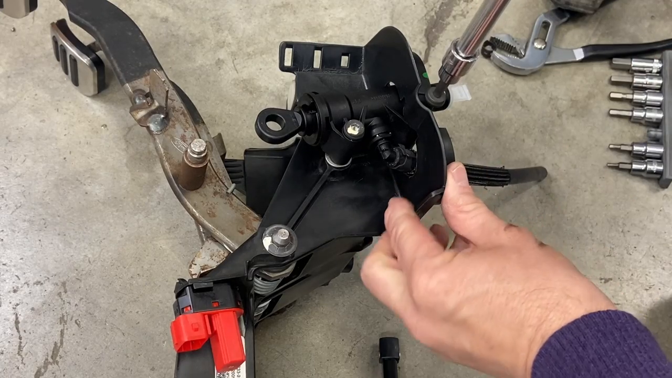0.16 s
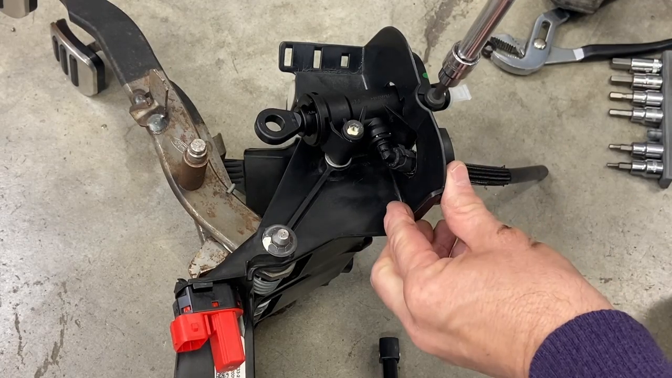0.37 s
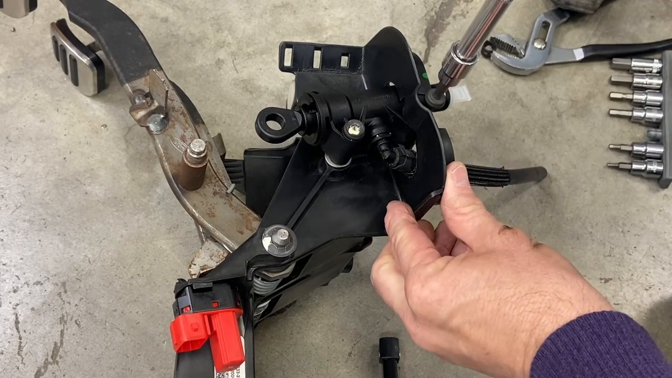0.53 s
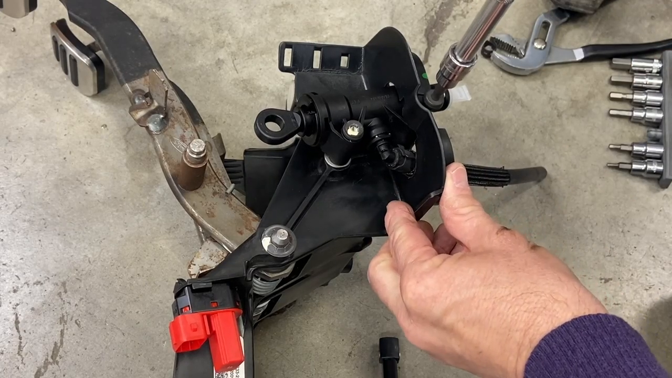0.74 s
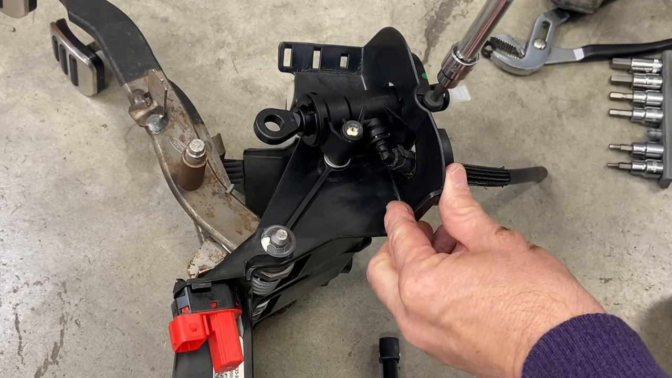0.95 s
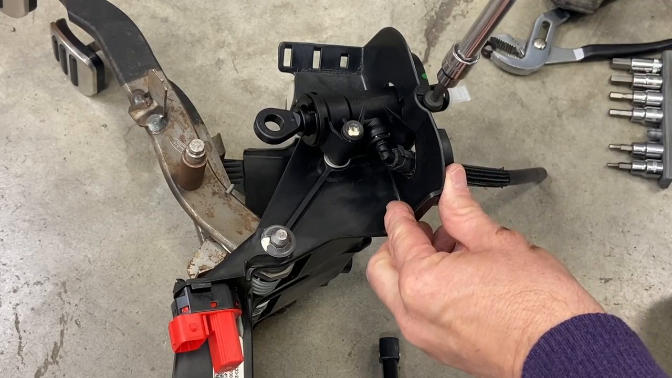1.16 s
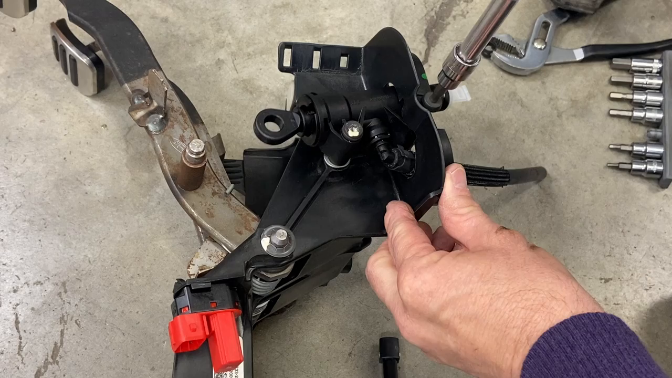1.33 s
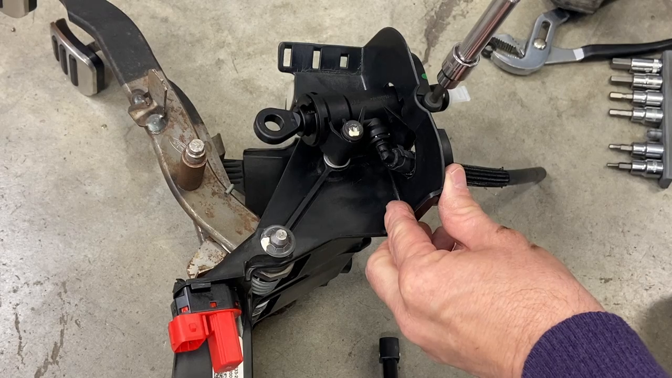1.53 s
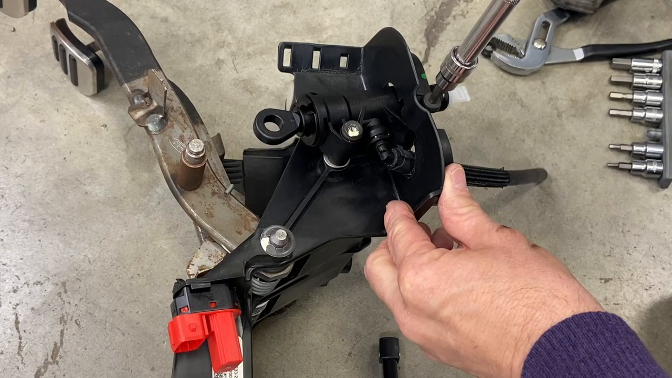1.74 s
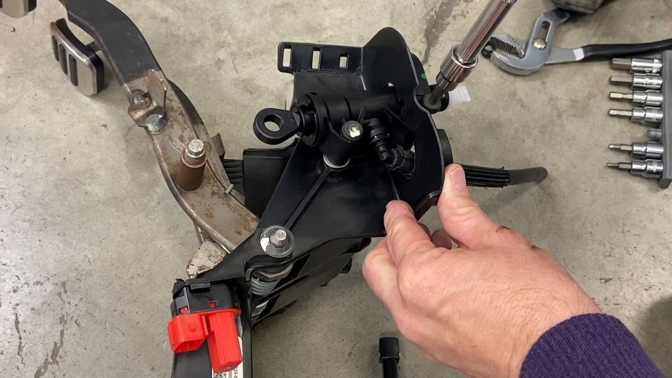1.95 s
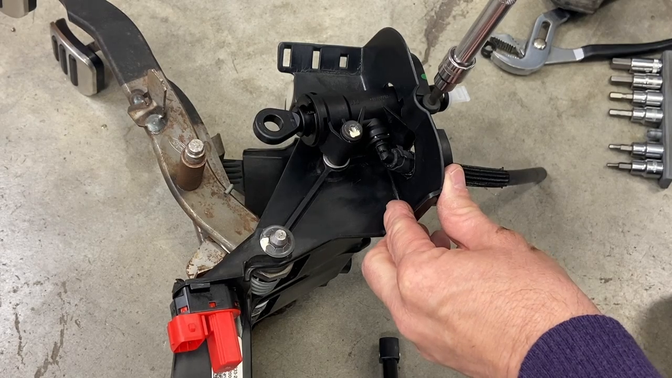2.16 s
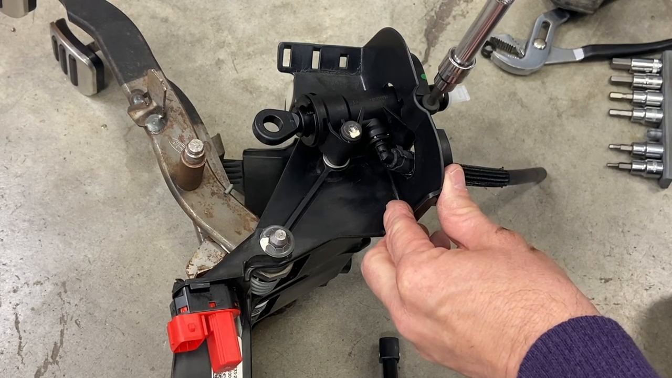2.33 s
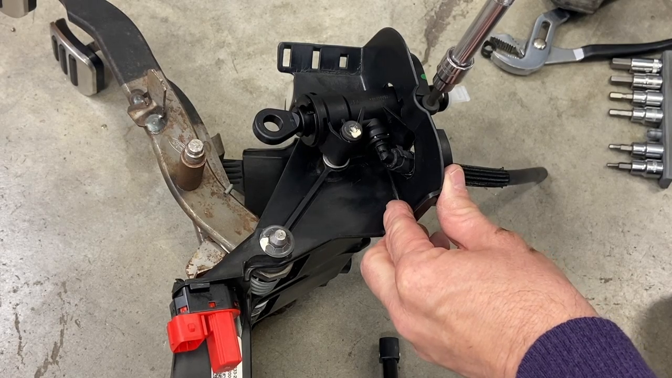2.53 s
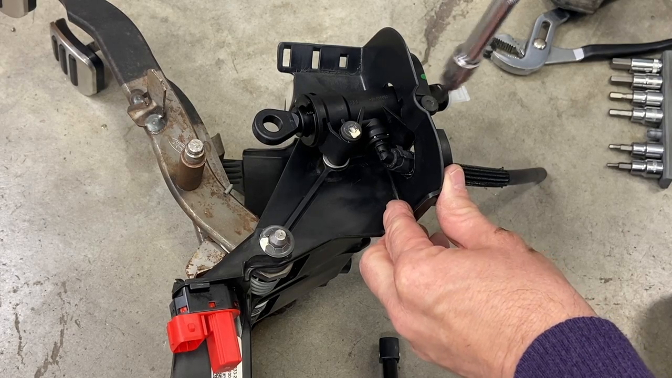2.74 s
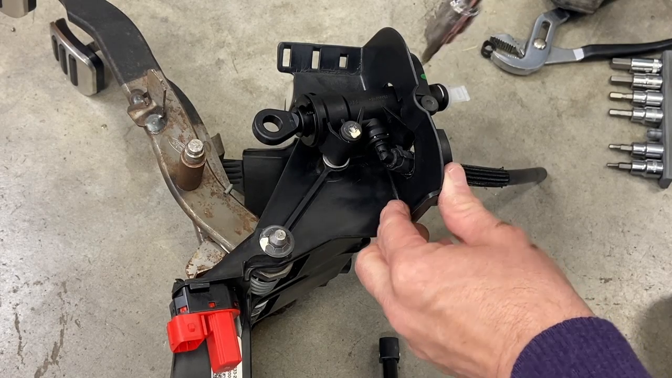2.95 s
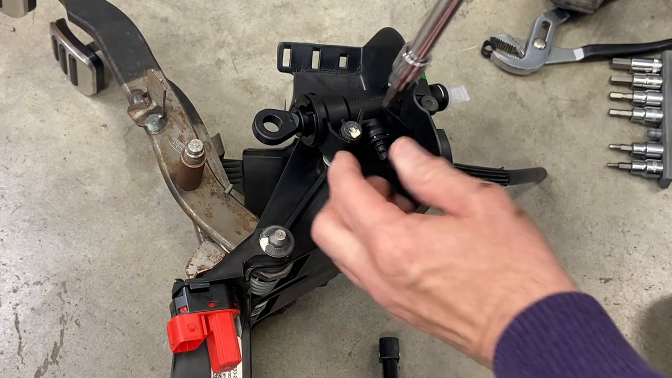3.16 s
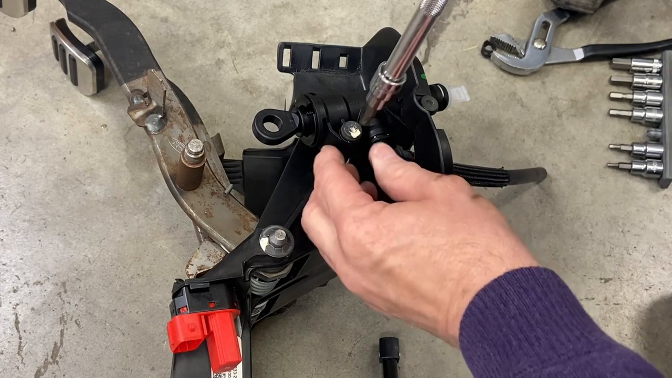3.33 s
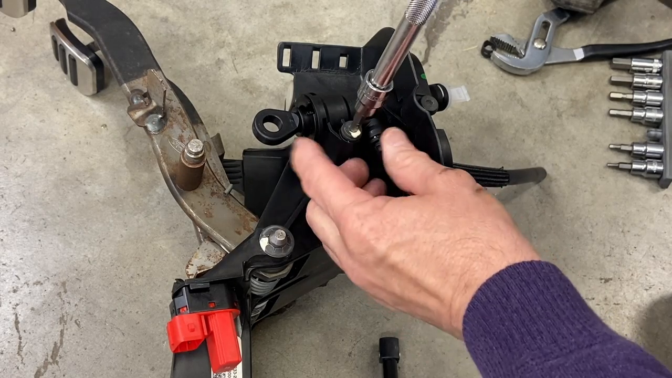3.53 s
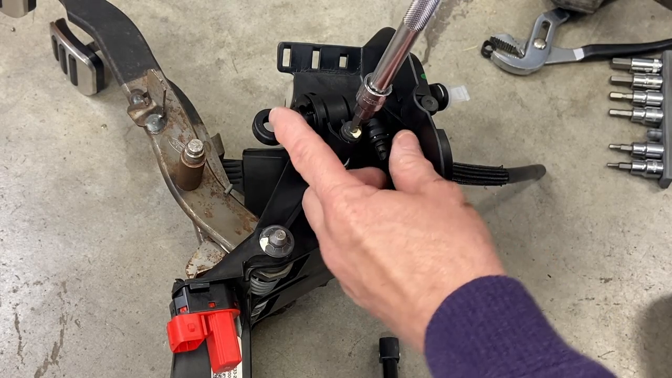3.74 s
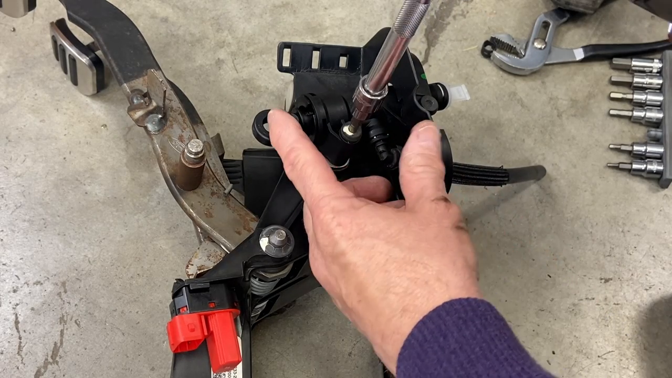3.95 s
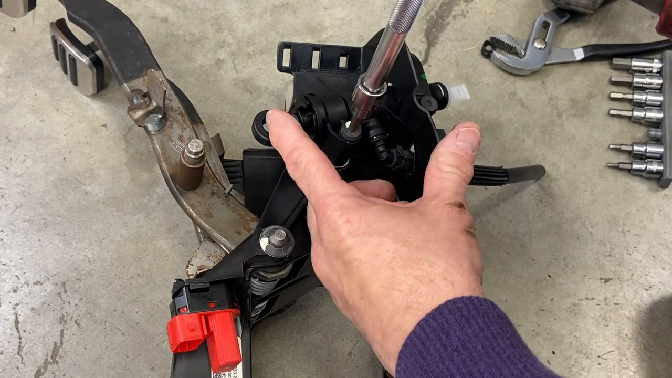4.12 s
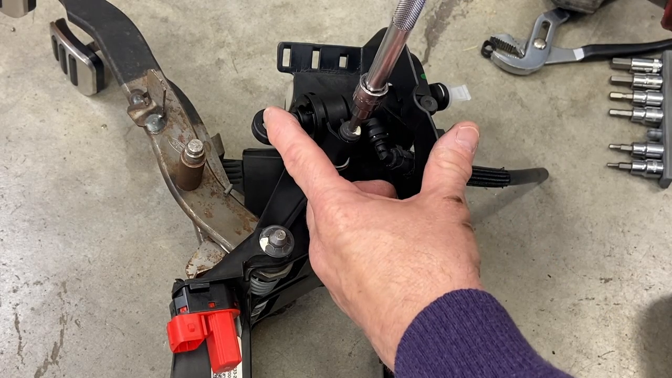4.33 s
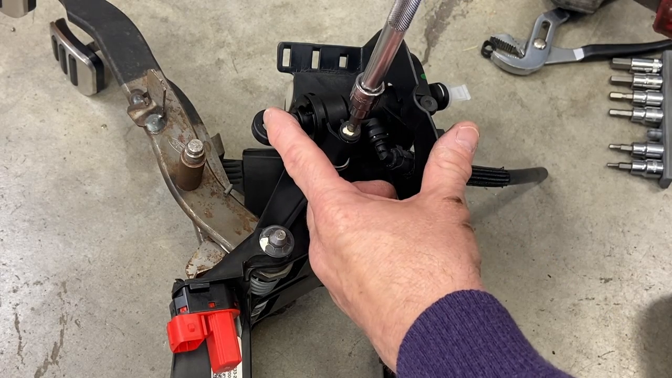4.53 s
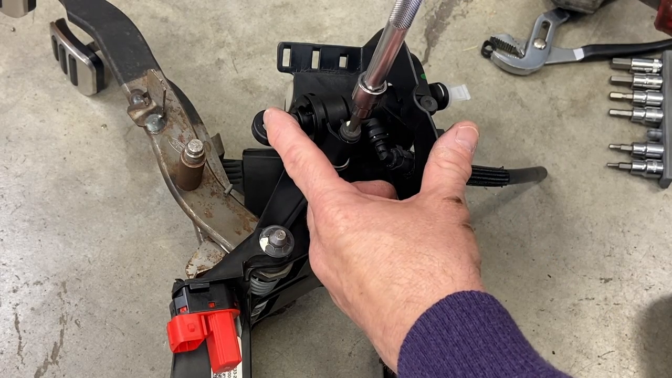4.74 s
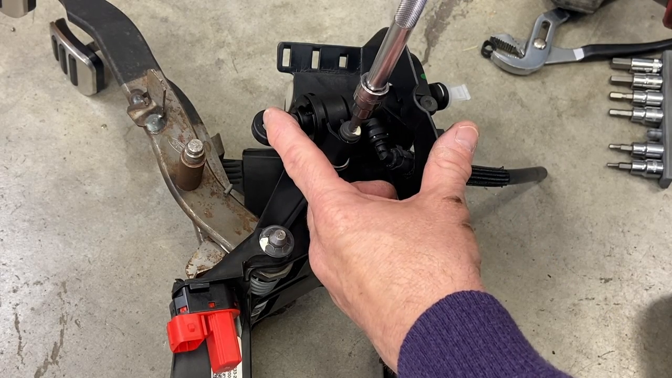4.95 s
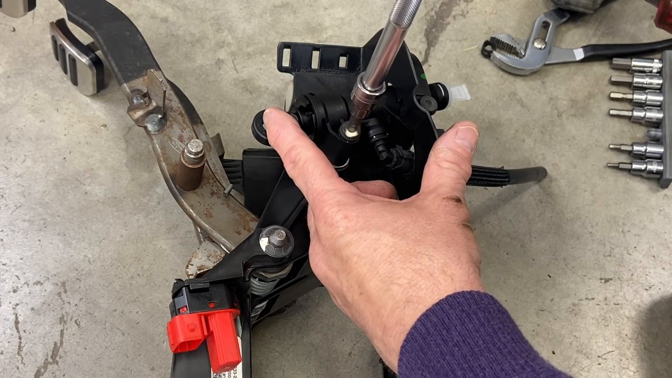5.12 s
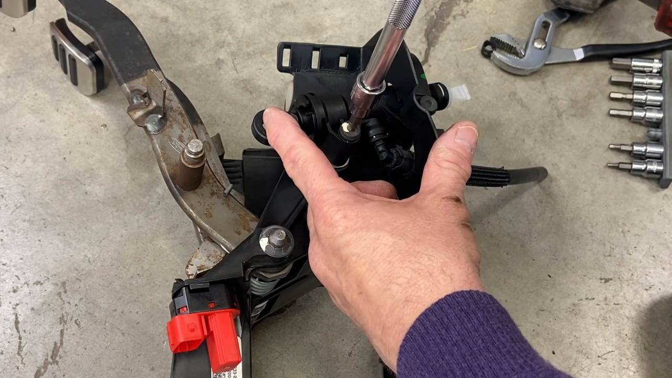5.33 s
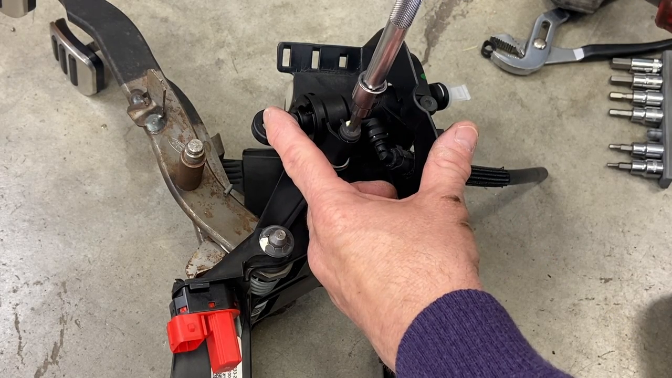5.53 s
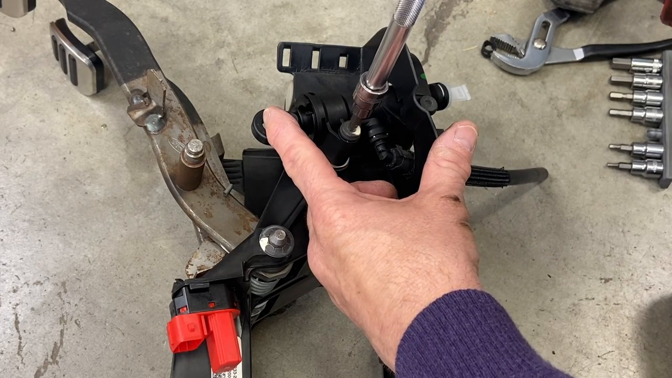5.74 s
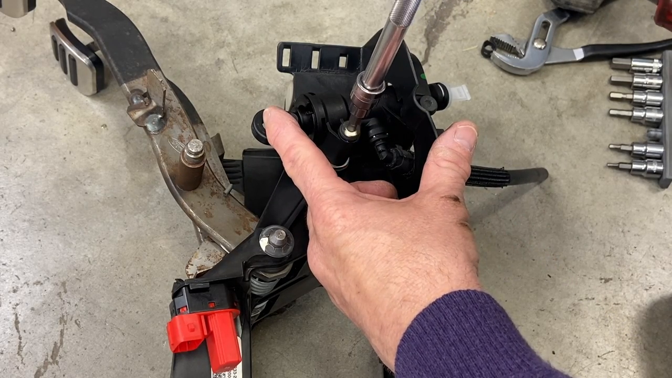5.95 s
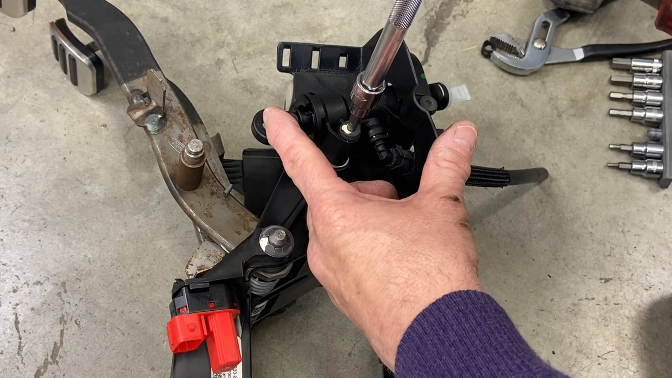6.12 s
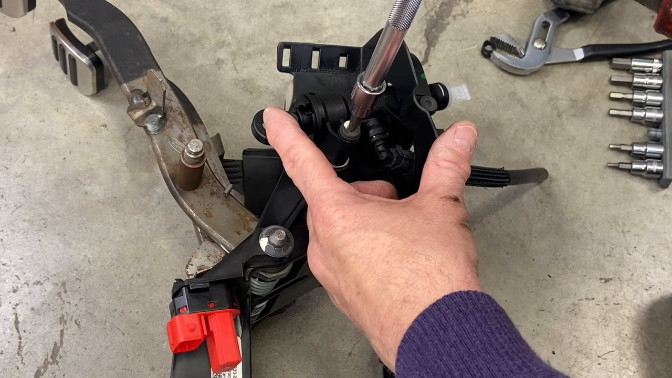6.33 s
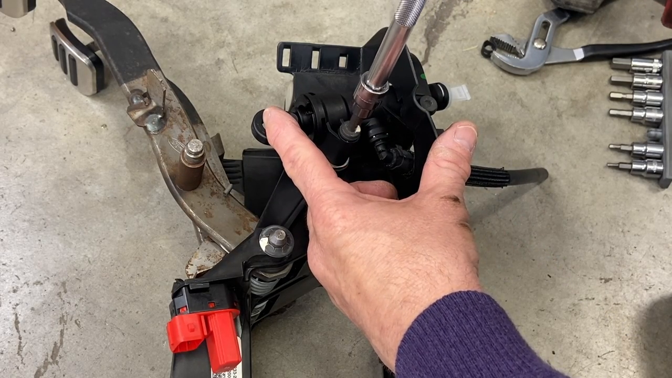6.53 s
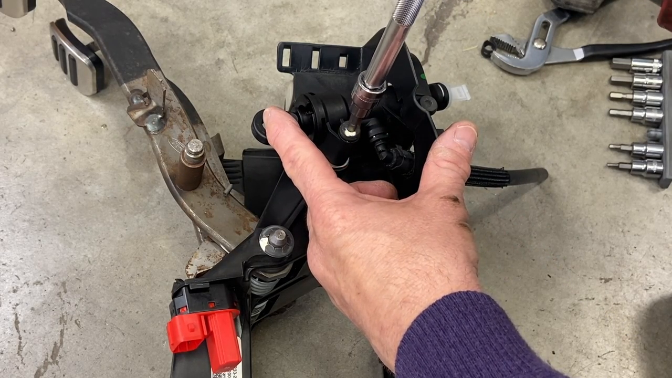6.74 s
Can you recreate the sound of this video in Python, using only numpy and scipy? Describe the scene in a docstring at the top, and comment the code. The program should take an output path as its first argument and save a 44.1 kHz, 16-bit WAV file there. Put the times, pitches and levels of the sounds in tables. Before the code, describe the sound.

Close power ratchet buzzing hard, a brief pause with steel socket knocks and scuffs, then a slower, lower, wavering ratcheting run in a garage.

```python
"""Cordless ratchet on two bolts

A cordless ratchet in a garage runs down one bolt at full trigger, then another feathered and slower.
A motor drives a crank through gears; each crank turn rocks a pawl that clacks over a few teeth.
Between the bolts the socket knocks and scuffs against the next head: noise cracks and ringing steel.
A phone with two ports listens close by, over a sparse-tap garage tail and a low hush."""
import sys
import numpy as np
from scipy import signal
from scipy.fft import rfft, irfft
from scipy.io import wavfile
from scipy.ndimage import uniform_filter1d

SR = 44100
rng = np.random.default_rng(int(sys.argv[2]) if len(sys.argv) > 2 else 0)


def boost(x):
    """Linear amplitude factor 10**(x/20) for a level x in decibels (scalar or array-like)."""
    u = np.asarray(x, float) / 20
    return 10 ** u


def materialize(psi):
    """Save the field psi as 16-bit PCM at rate SR to the path in sys.argv[1].

    A 1-D psi becomes a single channel; in a 2-D psi each row is a channel.
    """
    bounded = np.clip(np.atleast_2d(psi).T, -1, 1)
    quanta = np.round(bounded * 32767).astype(np.int16)
    wavfile.write(sys.argv[1], SR, quanta)


N = 298998

# hardest clacks: start_s, level_db
HARD_CLACKS = [(0.3072, -13.5), (0.4339, -8), (0.6619, -18), (0.7098, -22.5), (0.825, -7.5), (1.4137, -21),
               (1.8068, -11.5), (2.1026, -17.5), (2.135, -13.5), (2.4628, -13.5), (3.899, -14),
               (3.929, -16), (3.9609, -20.5), (4.1754, -20), (4.341, -17), (4.5406, -14.5), (4.7526, -18),
               (4.9851, -16), (5.0195, -13.5), (5.23, -18.5), (5.2699, -16), (5.4944, -18), (5.683, -21.5),
               (5.7214, -16), (5.7588, -30), (5.7967, -19), (6.0432, -14.5), (6.0886, -16.5),
               (6.1355, -16.5), (6.1818, -15), (6.3106, -17.5), (6.3495, -20.5), (6.4567, -16.5)]
FULL_SPEED_TURNS_PER_S = 61


def evened(x):
    """Scales to rms 1."""
    return x / np.sqrt(np.mean(x ** 2) + 1e-20)


def drifting(count, size):
    """Slow random drift of rms 1: noise averaged over size samples."""
    return evened(uniform_filter1d(rng.standard_normal(count), size=size))


def read(points, hz):
    """Reads a table on a log-frequency axis."""
    f, value = np.transpose(points)
    return np.interp(np.log(hz + 1), np.log(f + 1), value)


def colour(x, gain):
    """Filters by a gain given as a function of frequency."""
    spectrum = rfft(x) * gain(np.fft.rfftfreq(x.shape[-1], 1 / SR))
    return irfft(spectrum, x.shape[-1])


def add(mix, s, sound):
    """Mixes a sound in at time s."""
    part = mix[round(s * SR):][:len(sound)]
    part += sound[:len(part)]


def rings(modes, size):
    """One dying sine a mode."""
    t = np.arange(size) / SR
    return np.array([boost(db - 60 * t / t60) * np.sin(2 * np.pi * hz * t) for hz, db, t60 in modes])


def patchy(x, depth_db):
    """Bands a few hundred Hz wide swell and sink by chance over tens of milliseconds."""
    z = signal.stft(x, nperseg=512)[2]
    field = rng.standard_normal(z.T.shape)
    field = uniform_filter1d(field, size=5, axis=0)  # over time
    field = uniform_filter1d(field, size=7, axis=1).T  # over frequency
    return signal.istft(z * boost(depth_db * evened(field)), nperseg=512)[1][:len(x)]


def hush():
    """Steady low background: coloured noise."""
    # background spectrum: freq_hz, gain_db
    hush_curve = [(18, -41.5), (30, -22.5), (76, -5), (189, -20.5), (290, -16.5), (600, -30.5), (1000, -32),
                  (2000, -37), (4000, -59.5)]
    level_db = -82.5
    return boost(level_db) * evened(colour(rng.standard_normal(N), lambda hz: boost(read(hush_curve, hz))))


def garage(x):
    """Room tail: sparse taps of random sign, each band dying at its own speed."""
    # decay of the room: freq_hz, t60_s
    decay = [(200, .3), (1000, 0.44), (4000, 0.6), (9000, 0.37), (12000, 0.26), (15000, .2)]
    level_db = -14
    taps = np.zeros(SR)
    at = np.arange(300, SR - 20, 20)
    taps[at + rng.integers(0, 20, len(at))] = rng.choice([-1., 1.], len(at))
    hz, t, z = signal.stft(taps, SR, nperseg=256)
    tail = signal.istft(z * boost(-60 * t / read(decay, hz)[:, None]), SR, nperseg=256)[1]
    return boost(level_db) * signal.fftconvolve(x, tail / np.linalg.norm(tail))[:N]


def scattered(heard):
    """Nearby surfaces scatter a smeared copy: noise dying at one speed, coloured."""
    # part of opposite sign at the two ports: freq_hz, gain_db
    unlike_curve = [(40, -4), (150, -3), (300, -7), (800, -8), (1400, -3), (1900, -7), (2400, -21),
                    (3500, -27), (7000, -28), (8000, -22), (15000, -21)]
    size, t60_s = SR // 2, .5
    smear = rng.standard_normal(size) * boost(-60 * np.arange(size) / SR / t60_s)
    copy = signal.oaconvolve(heard, smear / np.linalg.norm(smear))[:N]
    return colour(copy, lambda hz: boost(read(unlike_curve, hz)))


def stop_thud(out):
    """Thud as the motor brakes after the first bolt: one low mode."""
    start_s, pitch_hz, level_db, t60_s = 2.79, 62, -47, .1
    add(out, start_s, rings([(pitch_hz, level_db, t60_s)], size=6000)[0])


def scuff():
    """Socket sliding onto the head: band-limited noise that rises fast and fades."""
    # slides: start_s, level_db, fade_db_per_s
    slides = [(3.479, -51.5, 170), (3.687, -46.5, 240)]
    rise_s = 0.0099
    noise = evened(colour(rng.standard_normal(N), lambda hz:
                          hz / 250 / (1 + (hz / 250) ** 2) / (1 + (hz / 6000) ** 2)))
    envelope = np.zeros(N)
    for start_s, level_db, fade_db_per_s in slides:
        since_s = np.maximum(np.arange(N) / SR - start_s, 0)
        envelope += np.minimum(since_s / rise_s, 1) * boost(level_db - fade_db_per_s * since_s)
    return noise * envelope


def knocks():
    """Socket on bolt head: each knock is a dull noise crack, ringing steel and a low frame ring."""
    # knocks: start_s, level_db, low_ring_db, steel_ring_db
    hits = [(3.1184, -58, -21, -20), (3.1354, -57, -19, -21), (3.1633, -46, -27, -32),
            (3.1794, -61, -22, -20), (3.482, -42.5, -10, -8.5), (3.491, -43, -3, -17),
            (3.5305, -40, -13, -25), (3.5384, -44, -9, -18), (3.548, -33, -18, -25),
            (3.5585, -25, -27, -18.5), (3.6897, -39, -24, -22), (3.7032, -25.5, -10.5, -21)]
    # ring modes, the frame first, then the steel: pitch_hz, level_db, t60_s
    socket_modes = [(548, -2, 0.057), (1050, -19, .02), (1445, 1, 0.03), (1960, -17, 0.018),
                    (2270, 7, 0.032), (2700, 6, 0.019), (3030, 5.5, .025), (3450, 6, 0.023),
                    (4070, -1, .02)]
    out, t, modes = np.zeros(N), np.arange(6000) / SR, rings(socket_modes, size=6000)
    for start_s, level_db, low_db, ring_db in hits:
        crack = signal.lfilter([.5, -.5], [1, -1.5, .56], rng.standard_normal(len(t)))
        crack *= boost(-60 * t / 0.033) + boost(-10 - 60 * t / 0.086)
        crack = signal.lfilter([.5, .5], [1], crack)  # dulls the very top
        steel = rng.uniform(0.9, 1, len(socket_modes) - 1) @ modes[1:]
        add(out, start_s, boost(level_db) * (0.3 * crack + boost(ring_db) * steel + boost(low_db) * modes[0]))
    return out


def switching(t, shaft):
    """Drive switching tone, pushed up by the fourth motor order."""
    tone_hz = 9800
    return np.sin(2 * np.pi * tone_hz * t + 4 * shaft)


def whistle(t, shaft):
    """Gear mesh whistles for a while, each on one motor order, fading quickly in and out."""
    # whistles, mostly where an order passes 4 kHz: start_s, end_s, motor_order, rms_db
    whistles = [(0, .85, 8, -44), (.87, 1.65, 8, -49), (3.76, 4.06, 18, -50), (4.12, 4.43, 16, -50),
                (4.87, 5.05, 20, -46), (5.07, 5.27, 20, -43), (6.4, 6.455, 20, -42)]
    edge_db_per_s = 400
    out = np.zeros(len(t))
    for start_s, end_s, order, rms_db in whistles:
        outside_s = np.maximum(np.maximum(start_s - t, t - end_s), 0)
        out += boost(rms_db - edge_db_per_s * outside_s) * np.sqrt(2) * np.sin(order * shaft)
    return out


def whine(shaft, rate, level_db):
    """Motor orders that come and go, sinking into the rattle at low speed."""
    # harmonics of the motor: motor_order, level_db
    orders = [(1, -6), (3, -7.5), (4, 2), (8, 0.5)]
    slow_db_per_octave = 4
    patches_db = np.minimum(7 * drifting(len(shaft), 1800), 4)
    slow_db = slow_db_per_octave * np.log2(rate / FULL_SPEED_TURNS_PER_S)
    tone = sum(boost(db) * np.sin(k * shaft) for k, db in orders)
    return boost(level_db + patches_db + slow_db) * tone


def thump(turns):
    """Yoke reversal: crank harmonics, with the crank place wobbling slightly."""
    # harmonics of the crank: crank_order, level_db
    orders = [(1, -14), (2, -11.5), (3, -13.5), (4, -14), (5, -11.5), (6, -9.5), (7, -21), (8, -4.5),
              (9, -4), (10, -13), (11, -3.5), (12, -4), (13, -2), (14, -0.5), (15, -2), (16, -18.5),
              (17, 1.5), (18, -0.5)]
    wobble_turns = .018 * drifting(len(turns), 1500)
    return sum(boost(db) * np.cos(2 * np.pi * k * (turns + wobble_turns) + k * k) for k, db in orders)


def whirr(turns, swell_db, place_turns, head_db, boom_db, tilt_db_per_octave):
    """Loose gear teeth rattle densely, more on the loaded stroke; the head and the part on the floor resonate."""
    # rattle spectrum: freq_hz, gain_db
    whirr_curve = [(30, -36), (65, -4.5), (150, -18.5), (400, -3), (1000, -1.5), (2400, 5), (5200, 6.5),
                   (7500, 7), (11000, 4.5), (15600, -3), (16200, -40.5)]
    head_hz, head_width_hz, boom_hz, boom_width_hz = 4150, 170, 135, 70
    ticks_per_s = 2500
    ticks = boost(4 * np.minimum(rng.exponential(1, len(turns)), 5))
    ticks *= rng.random(len(turns)) < ticks_per_s / SR
    ticks *= rng.choice([-1, 1], len(turns))
    rattle = 0.64 * evened(ticks) + rng.standard_normal(len(turns))
    rattle *= boost(swell_db * np.cos(2 * np.pi * (turns - place_turns)))

    def gain(hz):
        gain_db = read(whirr_curve, hz) + tilt_db_per_octave * np.log2(np.maximum(hz / 4500, 1))
        gain_db += head_db / (1 + (2 * (hz - head_hz) / head_width_hz) ** 2)
        gain_db += boom_db / (1 + (2 * (hz - boom_hz) / boom_width_hz) ** 2)
        return boost(gain_db)

    sound = colour(patchy(rattle, depth_db=1.5), gain)
    band = colour(sound, lambda hz: (hz > 1500) * (hz < 4500))
    return sound / np.std(band)  # rms 1 in that band


def clacks(length, at, size_db):
    """Each clack and its two quick bounces ring the pawl modes in their own mix and a little off pitch."""
    # pawl modes: pitch_hz, level_db, t60_s
    pawl_modes = [(2320, -25.5, 0.016), (3070, -13.5, 0.0084), (5170, -9, 0.016), (5510, -21, 0.0083),
                  (6470, -6.5, 0.0085), (6996, -0.5, 0.007), (8240, -5, 0.014), (9253, 9, 0.0077),
                  (10090, -1.5, 0.016), (10800, -3, 0.0091), (12060, 0, .005), (13810, -1.5, 0.0039),
                  (15050, -8.5, 0.01)]
    hz, db, t60 = np.transpose(pawl_modes)[:, :, None]
    t, out = np.arange(500) / SR, np.zeros(length + SR)
    chance = rng.standard_normal((len(at), 3, len(pawl_modes), 1))
    for start, level_db, (detune, mix, late) in zip(at.astype(int), size_db, chance):
        sines = np.sin(2 * np.pi * hz * (1 + .022 * detune) * t)
        ring = (boost(db + 3 * mix - 60 * t / t60) * sines).sum(0)
        ring *= np.minimum(t / .0003, 1)  # soft first touch
        ring *= 2 * boost(level_db) / abs(ring).max()
        bounce = start + int(SR * .0012 * (.5 + abs(late[0, 0])))
        again = bounce + int(SR * .0016 * (.5 + abs(late[1, 0])))
        for place, gain in [(start, 1), (bounce, 0.28), (again, 0.55)]:
            out[place:place + len(t)] += gain * ring
    return out[:length]


def pawl(t, turns, teeth):
    """The pawl drops over the same few teeth every turn, a little early or late."""
    spread_db = 2.6  # clack to clack
    place, db, scatter = np.transpose(teeth)
    whole = np.arange(np.ceil(turns[-1]) + 1)[:, None]
    drift = rng.standard_normal((len(whole), len(teeth)))
    drift = evened(uniform_filter1d(drift, size=4, axis=0))
    at = np.interp(whole + place + scatter * drift, turns, np.arange(len(t)), -1, -1).ravel()
    size_db = (db + spread_db * rng.standard_normal(drift.shape)).ravel()
    # a hard clack takes the tooth's place
    gap_s = abs(t[0] + at[:, None] / SR - np.transpose(HARD_CLACKS)[0]).min(1)
    used = (gap_s > .003) & (at > 0)
    return evened(clacks(len(t), at[used], size_db[used]))


def ratchet(speed, first_turn, load, clack_db, teeth, bolt):
    """One bolt run down: whirr, whine, thump and clacks on one crank."""
    whirr_db, whirr_db_per_octave = -32.5, 7.5  # at full speed; rise with speed
    clack_db_per_load_db, motor_turns_per_crank_turn = 1.5, 7.135
    start_s, brake_s, silent_db = 0.021, .018, -18  # trigger pulled, released
    swell_db, place_turns, thump_db, whine_db, head_db, boom_db, switch_db, tilt_db_per_octave = bolt

    t = np.arange(speed[0][0], speed[-1][0], 1 / SR)
    rate = uniform_filter1d(np.interp(t, *np.transpose(speed)), size=6000, mode="nearest")
    turns = first_turn + np.cumsum(rate) / SR
    waver = 1 + .002 * drifting(len(t), 900)
    shaft = 2 * np.pi * np.cumsum(motor_turns_per_crank_turn * rate * waver) / SR
    load_db = np.interp(t, *np.transpose(load))

    # no ramp where the tool already runs at 0 s or still runs at the end
    off = np.clip(1 - (t - t[0]) / start_s, 0, 1) * (t[0] > 0)
    off += np.clip(1 - (t[-1] - t) / brake_s, 0, 1) * (t[-1] < N / SR - .1)
    ramp_db = silent_db * off
    level_db = whirr_db + whirr_db_per_octave * np.log2(rate / FULL_SPEED_TURNS_PER_S) + ramp_db

    body = whirr(turns, swell_db, place_turns, head_db, boom_db, tilt_db_per_octave)
    body += boost(thump_db) * thump(turns)
    body += whine(shaft, rate, whine_db)
    body += boost(switch_db) * switching(t, shaft)
    # clacks feel load more and take the ramp twice
    clatter = boost(clack_db + clack_db_per_load_db * load_db + ramp_db) * pawl(t, turns, teeth)
    tool = boost(level_db) * (boost(load_db) * body + clatter)
    return t[0], tool + boost(ramp_db) * whistle(t, shaft)


def scene():
    """The tool and the socket close by, the garage tail, a low hush."""
    # crank speed under the trigger finger, one table a bolt: time_s, speed_turns_per_s
    speeds = [
        [(0, 60.5), (.12, 61.1), (.6, 61.3), (2.8, 60.8)],
        [(3.75, 31.48), (4.07, 31.87), (4.24, 37.58), (4.88, 29.94), (4.96, 29.89), (5.43, 25.77),
         (5.77, 26.94), (6.15, 20.63), (6.61, 33.69), (6.78, 31.37)],
    ]
    # work on the thread, one table a bolt: time_s, load_db
    loads = [
        [(0, 6), (.1, 4.5), (.3, 0.5), (.5, 2.5), (.76, 1), (1, 0.5), (1.3, 0.3), (1.55, 0.4), (2.05, 0.5),
         (2.45, 0.7), (2.55, 2.7), (2.8, -2.5)],
        [(3.75, 0.5), (3.9, -0.4), (4.04, -1), (4.18, 0.3), (4.6, -0.44), (5.2, 0.7), (5.5, 0.8), (6.06, 2),
         (6.36, 1.74), (6.78, 1.5)],
    ]
    # teeth passed in one crank turn, one table a bolt: place_turns, level_db, scatter_turns
    teeth_sets = [
        [(-.16, -6, .025), (-.04, 0, .025), (.1, -12, .04), (.22, -5, .025), (.5, -10, .04), (.68, -13, .04)],
        [(-.36, -13, .03), (-.24, -14, .03), (-.11, 0, .015), (.04, -3, .02), (.16, -8, .025), (.29, -12, .03),
         (.45, -17, .04)],
    ]
    # tool tone, one row a bolt: whirr_swell_db, swell_place_turns, thump_db, whine_db,
    # head_resonance_db, low_boom_db, switching_db, whirr_tilt_db_per_octave (above 4500 Hz)
    bolts = [(1.5, 0.39, -17, -18, -3.5, 0.5, -68, 1), (4, 0.25, -25.5, -16.5, 0.5, 8.5, -8.5, -7)]
    first_turns = (.34, .03)  # crank place at each start
    clacks_db = (7, 10)  # above the whirr, before load

    near = knocks() + scuff()
    stop_thud(near)
    hard_s, hard_db = np.transpose(HARD_CLACKS)
    near += clacks(N, hard_s * SR, hard_db)
    for parts in zip(speeds, first_turns, loads, clacks_db, teeth_sets, bolts):
        add(near, *ratchet(*parts))
    heard = near + garage(near) + hush()
    unlike = scattered(heard)
    return np.array([heard + unlike, heard - unlike])


def roll_off(x):
    """The treble ends steeply here."""
    return signal.sosfilt(signal.butter(12, 17070, fs=SR, output="sos"), x)


def record(dry):
    """Two ports: rounded peaks, a band limit, small differences in level and, in the treble, phase."""
    # level between ports: freq_hz, left_minus_right_db
    lean = [(60, 0), (140, -1), (330, -3.5), (500, -2), (770, 1.5), (1800, 1), (2500, 0)]
    # phase between ports: freq_hz, left_lead_rad
    lead = [(7490, 0), (7750, -1.1), (8830, -3.03), (9120, -3.22), (10900, -6.1), (11600, -6.5),
            (12950, -9.2), (13600, -9.65), (14700, -12.3), (16600, -12.6)]
    edge_hz = 15720
    rounded = .9 * np.tanh(dry / .9)  # the input rounds off the hardest peaks
    side = np.array([[.5], [-.5]])

    def port_gain(hz):
        edge = boost(-36 * np.clip((hz - edge_hz) / 250, 0, 1))
        return edge * boost(side * read(lean, hz)) * np.exp(1j * side * read(lead, hz))

    return roll_off(colour(rounded, port_gain))


dry = scene()
out = record(dry)
materialize(out)
```